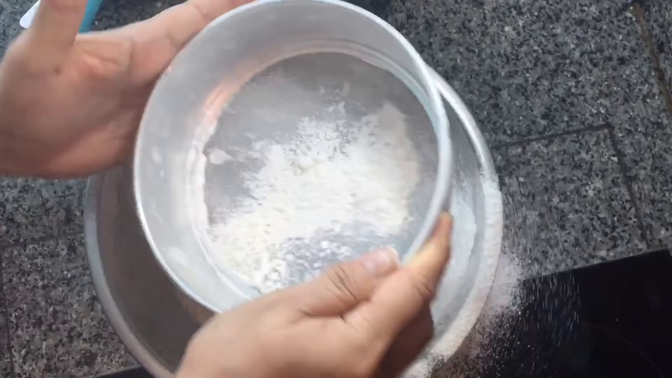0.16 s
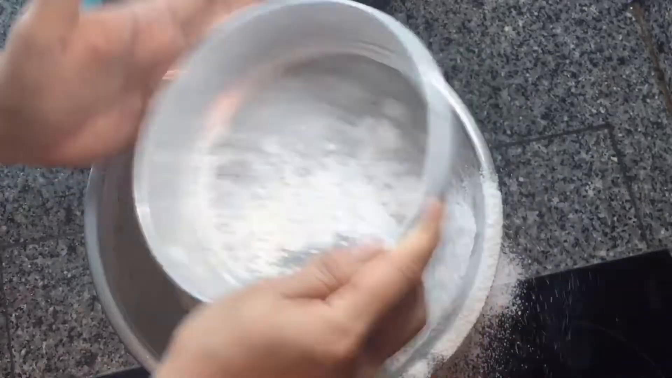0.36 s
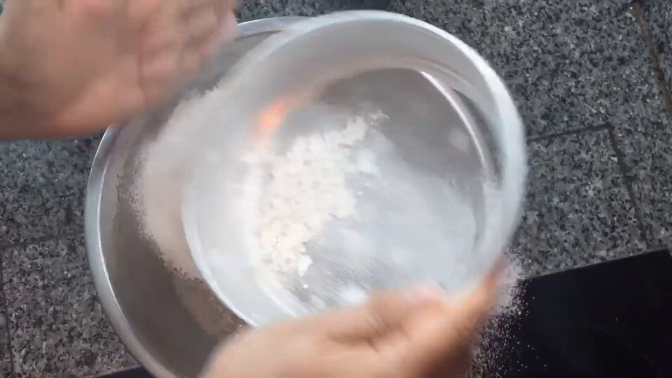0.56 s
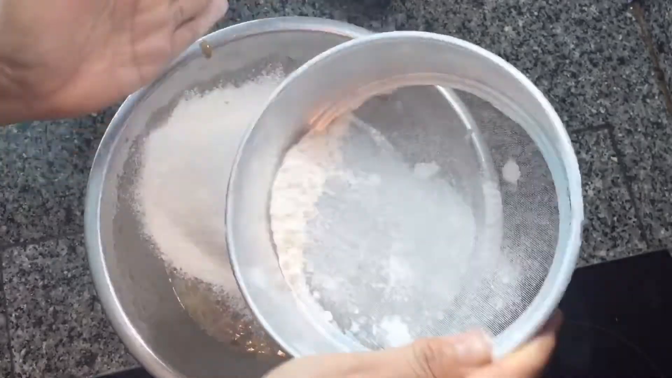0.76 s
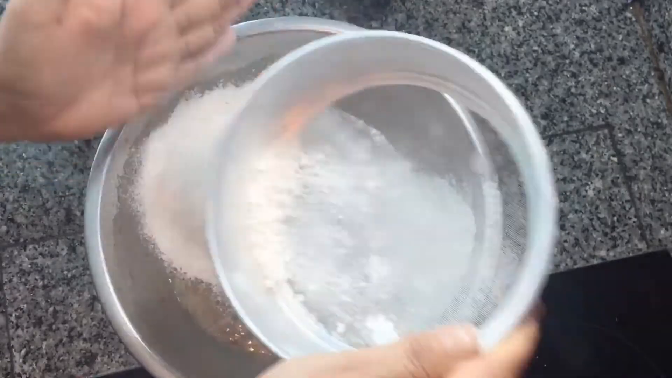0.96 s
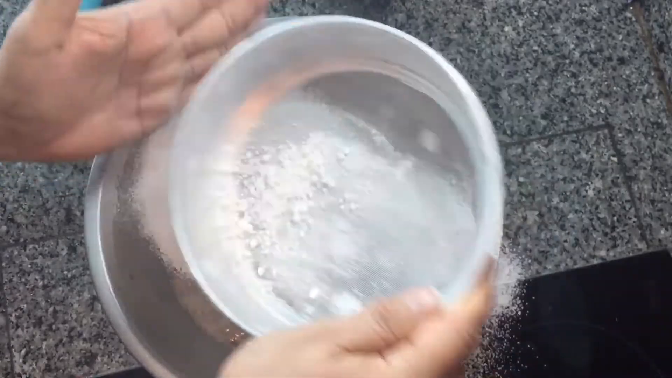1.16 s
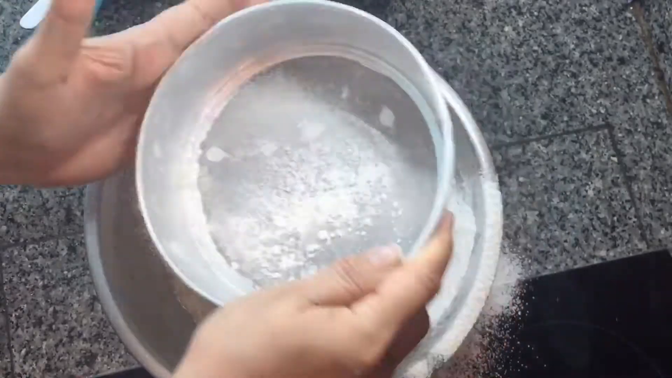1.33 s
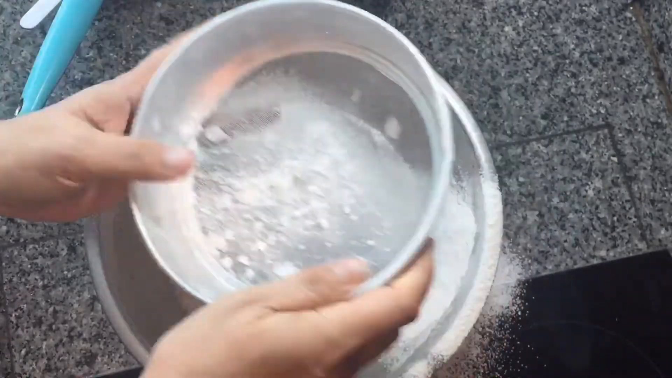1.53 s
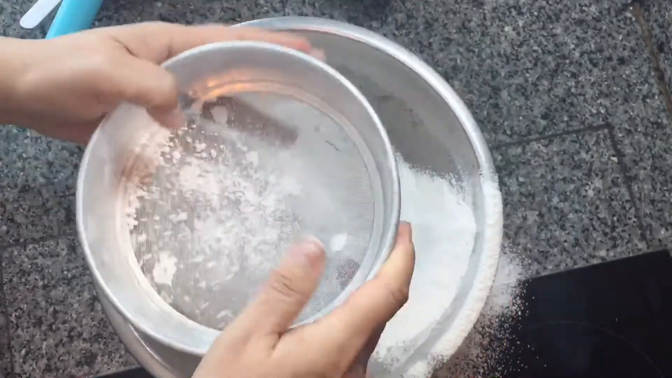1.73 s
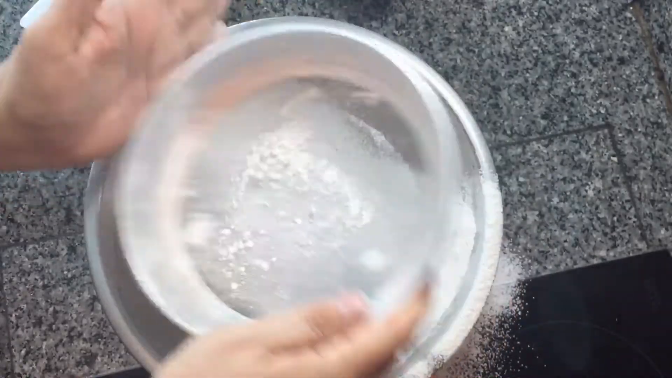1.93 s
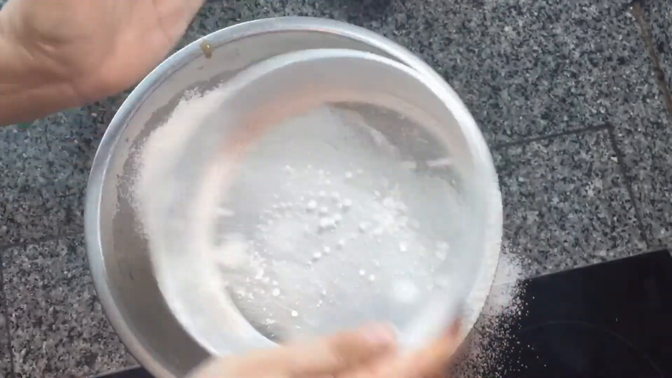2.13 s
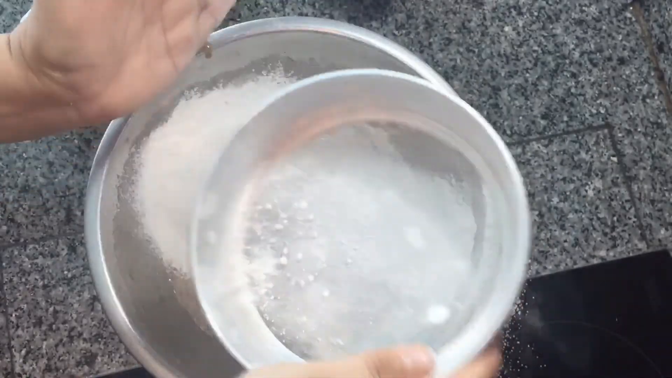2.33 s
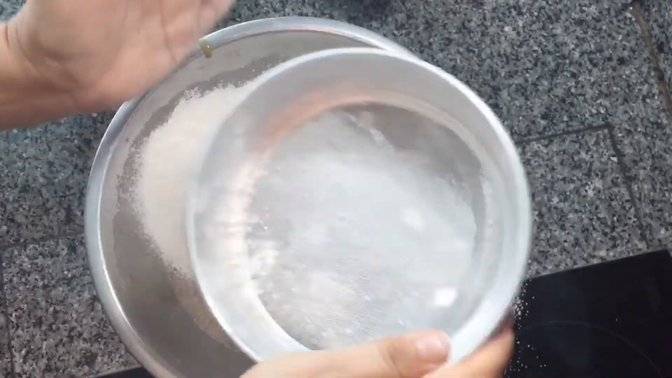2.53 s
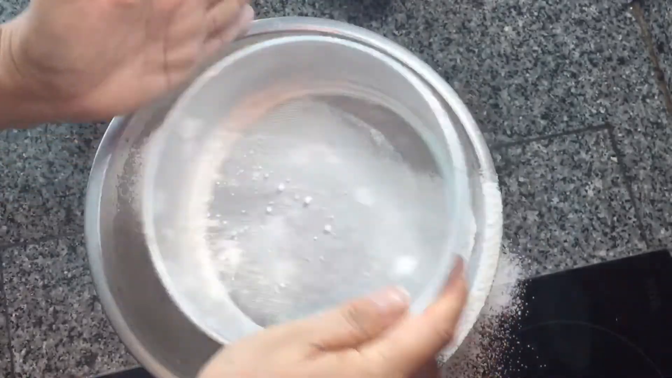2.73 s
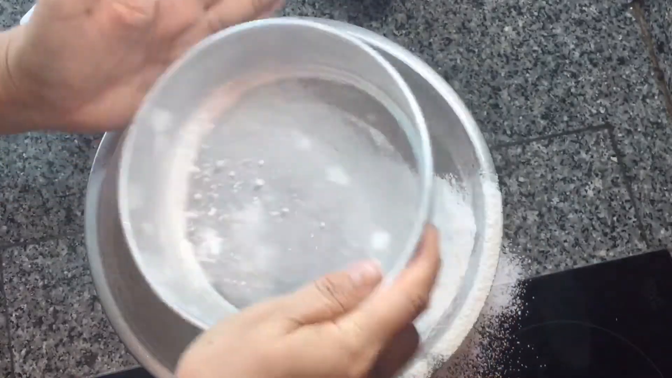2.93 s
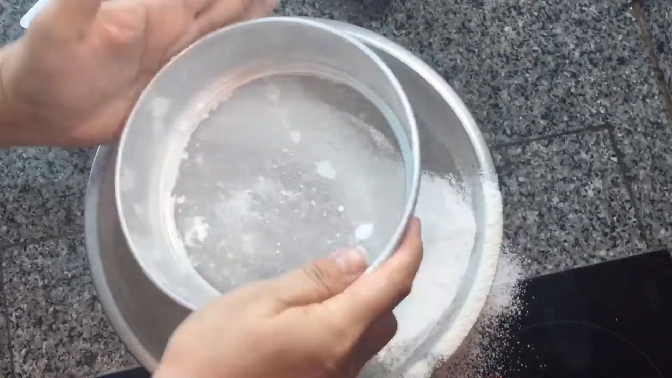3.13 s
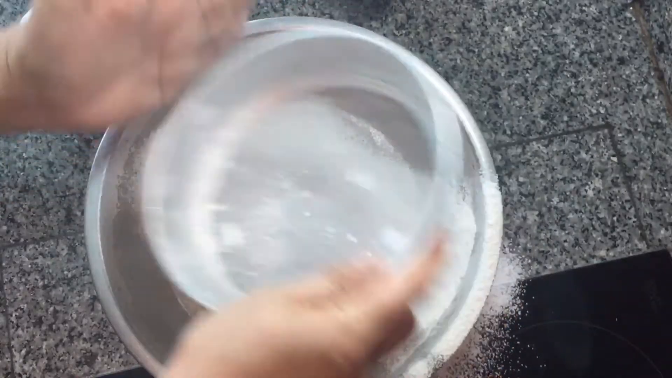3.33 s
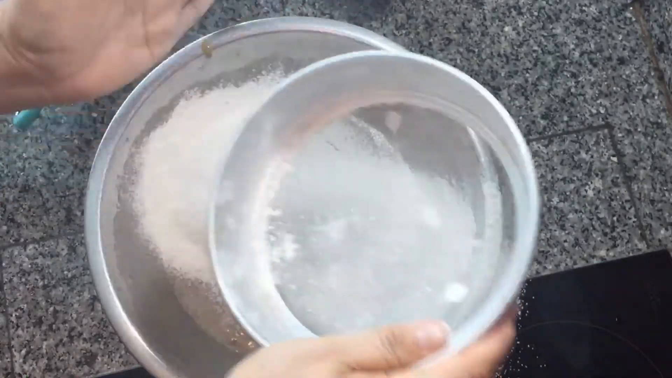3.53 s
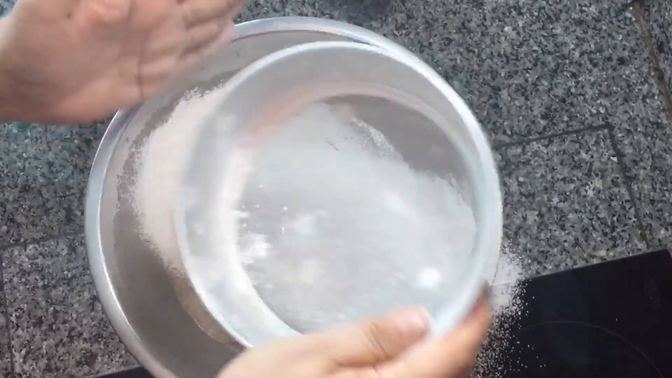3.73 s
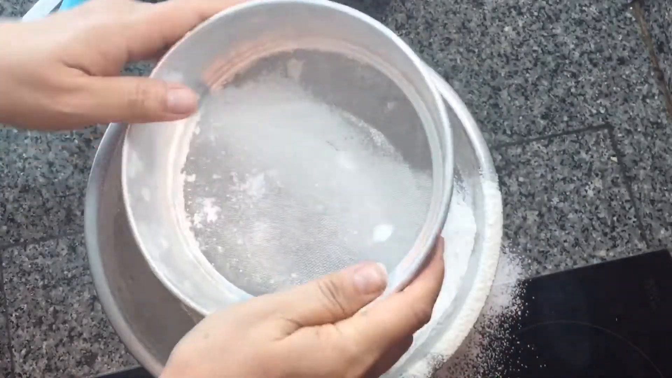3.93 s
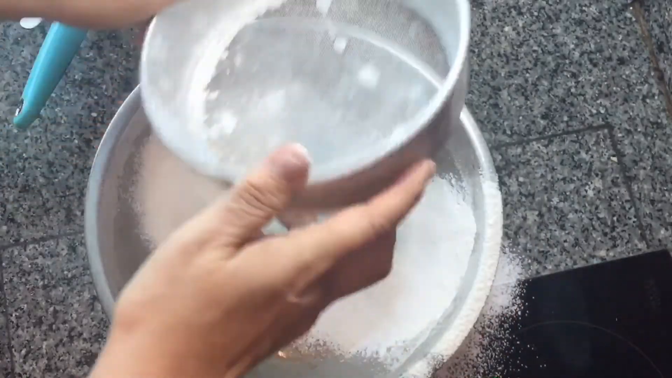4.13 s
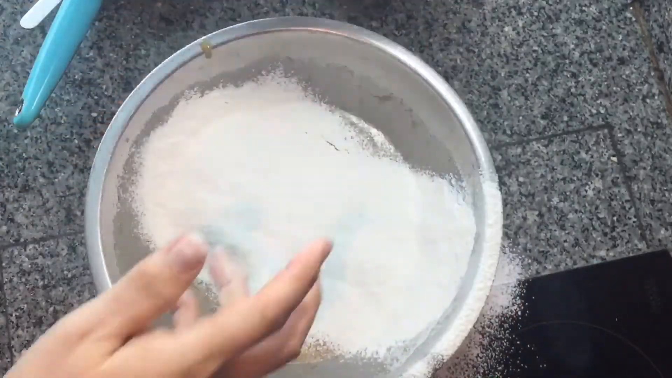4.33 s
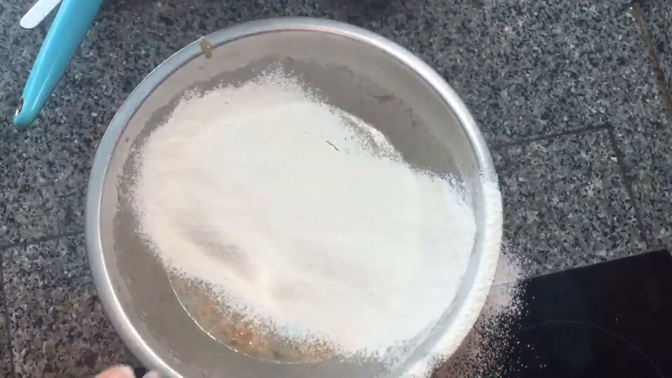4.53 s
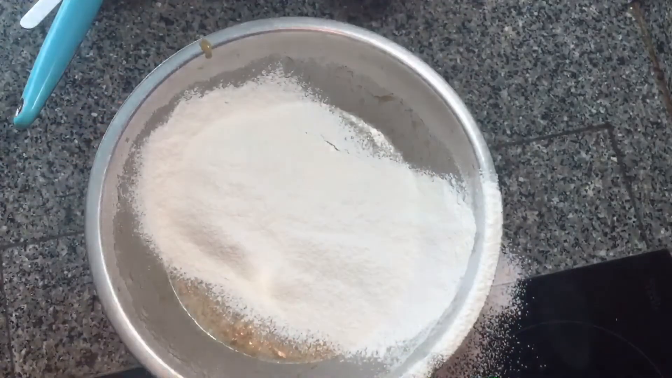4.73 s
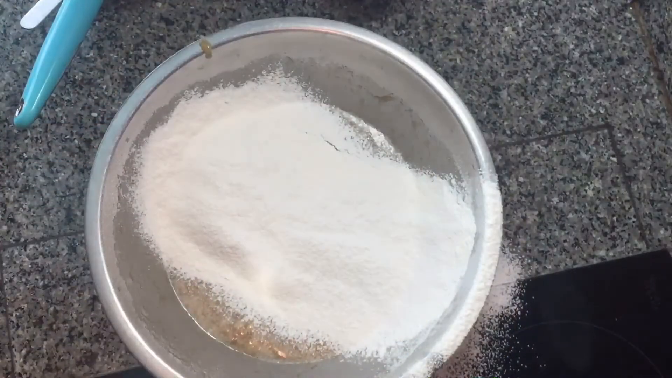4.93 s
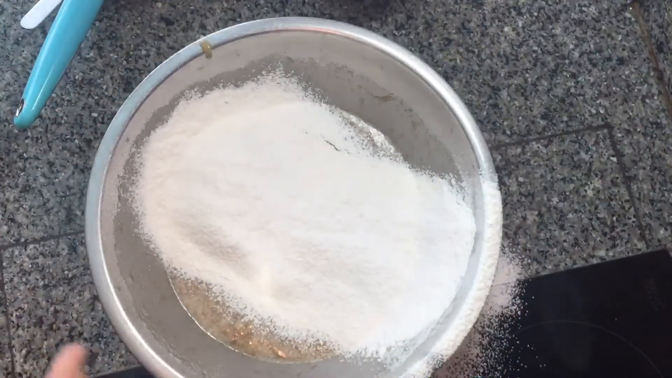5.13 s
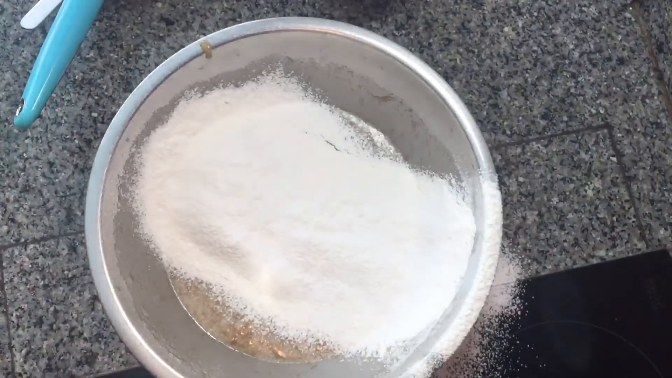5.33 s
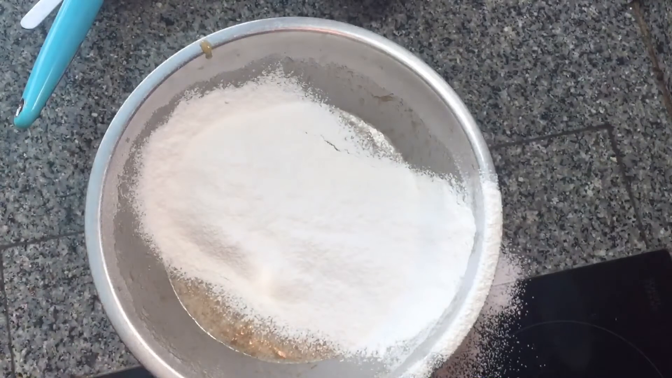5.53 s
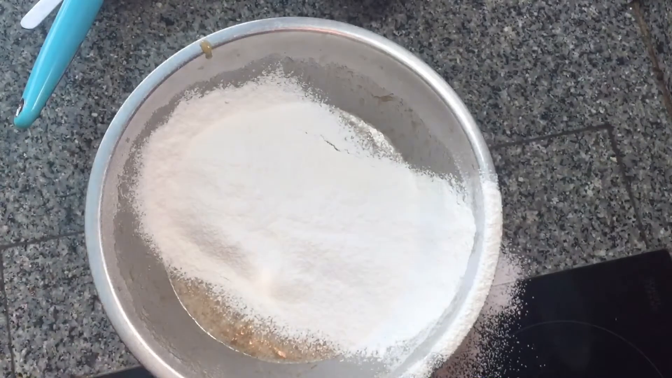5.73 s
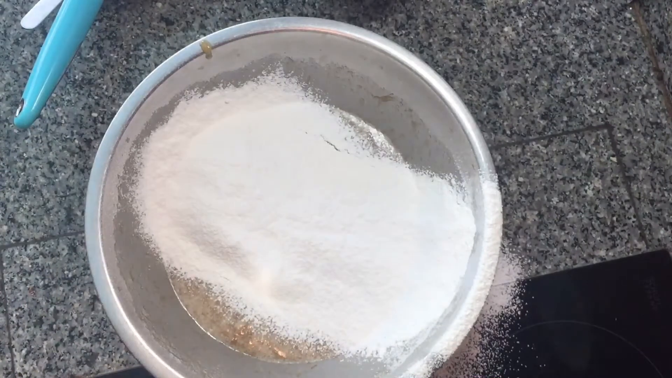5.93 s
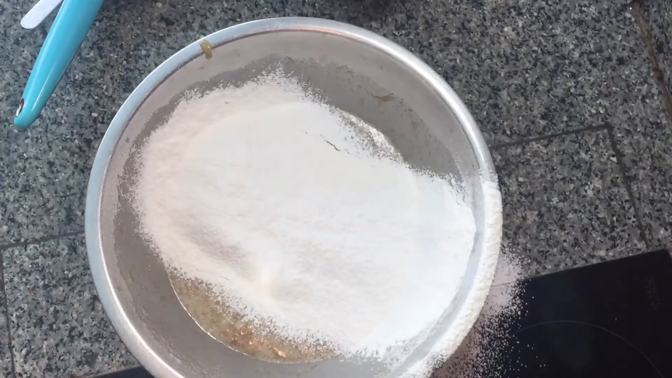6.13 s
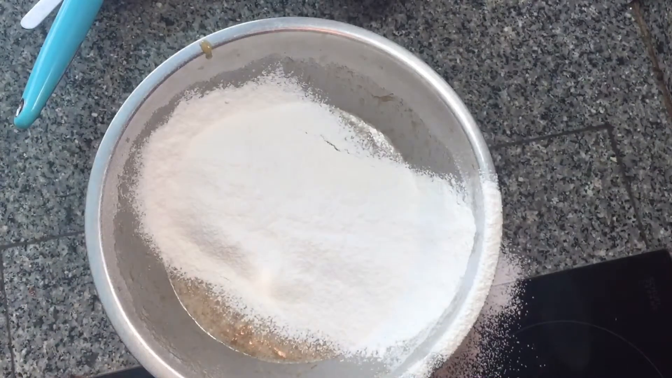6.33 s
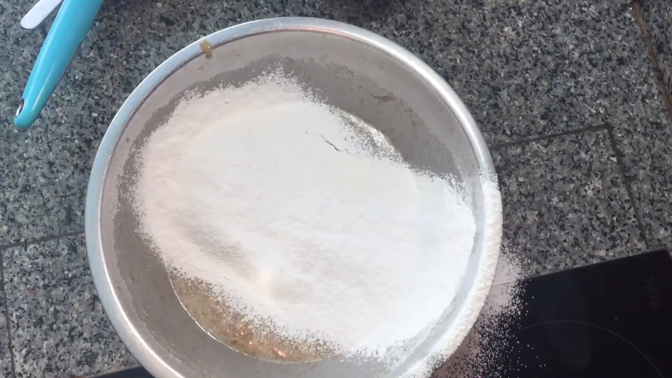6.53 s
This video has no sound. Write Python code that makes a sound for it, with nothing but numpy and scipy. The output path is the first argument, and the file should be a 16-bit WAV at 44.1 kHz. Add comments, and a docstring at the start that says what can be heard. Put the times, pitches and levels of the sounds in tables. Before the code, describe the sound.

A metal sieve is knocked against a palm about four times a second, each blow a sharp, rattling clack with a dull thud and a faint hiss of flour. After about four seconds the knocking stops. The sieve lands on a stone counter with a quick clatter, followed by a soft bump and hands brushing together. A kitchen appliance hums low throughout, with the microphone close above the bowl.

```python
"""Sifting flour over a steel bowl.

A round sieve is knocked against a palm about four times a second: its loose mesh ring clacks in the
frame, the mesh thuds, flour hisses through. Fingers slide on the rim, the sieve lands and rocks on the
stone counter, and floury hands are brushed off. A kitchen appliance hums throughout."""
import sys
import numpy as np
from scipy import signal
from scipy.fft import rfft, irfft, next_fast_len
from scipy.io import wavfile
from scipy.ndimage import uniform_filter1d, map_coordinates

SR = 44100
rng = np.random.default_rng(int(sys.argv[2]) if len(sys.argv) > 2 else 0)


def dump(signal):
    """Clip the signal to [-1, 1] and save it as 16-bit WAV at the path in sys.argv[1]."""
    limited = np.clip(np.atleast_2d(signal).T, -1, 1)
    pcm = np.round(limited * 32767).astype(np.int16)
    wavfile.write(sys.argv[1], SR, pcm)


N = 290178
TIME_S = np.arange(N) / SR
AGE_S = np.arange(SR // 3) / SR  # time since a blow

# Knocks. Each row: start in seconds, clack level in dB, place (0 wall, 1 lip), then mesh thud,
# frame knock and sizzle trims in dB on that level.
KNOCKS = [(0.0211, 2.5, .1, 15.5, -2, -0.5), (0.2395, 5, 0.13, 13.5, 1.5, -3), (0.482, 13, .1, 3, 2, -10),
          (0.708, 6, 0.09, 4, 3.5, -1.5), (0.9469, 8, 0.47, 13, 0.5, -2.5),
          (1.1885, 13, 0.18, 5, -1.5, -14), (1.4147, 5, .2, 7.5, 4.5, -0.5),
          (1.6242, -10, .2, 16.5, 5.5, 1), (2.0631, 2.5, 1, -13, -3, 1), (2.2853, -1, 0.76, -15, -25, -1),
          (2.2911, -9, .7, -9, -3, 12.5), (2.5003, 1.5, 0.98, -4, -3, 1.5),
          (2.7263, 9.5, 0.96, -11.5, -6.5, -3), (2.9579, 14.5, 1, -11.5, -8.5, -2),
          (3.2039, 16, 1, -13, -9, -9), (3.4591, 13, 0.53, -5.5, -15.5, -7.5),
          (3.7049, 11, 0.35, -7.5, 0.5, -9), (3.9424, 3.5, 0.26, 17, 9.5, -0.5)]
# Hand-held frame. Each row: mode in Hz, wall-struck dB, lip-struck dB, base t60 in seconds.
FRAME_MODES = [(930, -3, -8, .04), (1170, -3, -1, .05), (1400, -2, -7, .04), (1620, -3, -6, .04),
               (1850, 1, -5, .045), (2010, 2, 2, .055), (2170, -5, 3, .06), (2670, 1, -5, .05),
               (2830, -4, -2, .055), (3240, -8, -2, .05), (3400, -4, -8, .05), (3650, -8, -2, .04),
               (3915, -2, -1, .05), (4270, -5, -4, .04), (4800, -6, -6, .04), (5600, -7, -5, .035),
               (6530, -2, -1, .045), (6740, -9, -2, .04), (8350, -8, -6, .025), (9700, -9, -7, .02)]
# Taut mesh; frame on the counter. Each row: mode in Hz, level in dB, base t60 in seconds.
MESH_MODES = [(255, -12, 0.094), (481, -9, .03), (566.4, -1.5, 0.092), (617, 2, 0.088), (704, 6, 0.007)]
RESTING_MODES = [(540, -9, .04), (794, -2, .09), (968, 0, .08), (1042, -1, .07), (1100, -4, .06),
                 (1205, -2, .06), (1272, -3, .07), (1341, 0, .08), (1445, -5, .05), (1548, -3, .07),
                 (2261, -18, .08), (2670, -17, .07), (2900, -16, .07), (3320, -13, .11), (3908, -20, .07),
                 (5588, -20, .08)]
# Contacts. Each row: start in seconds, relative level in dB.
LANDING_CONTACTS = [(4.8042, -2), (4.8095, -8), (4.8208, 0), (4.8275, -10), (4.835, -11), (4.8435, -7),
                    (4.8575, -8)]
RING_TICKS = [(1.698, -36), (1.806, -24), (1.906, -32), (4.165, -24.5), (4.888, -10), (4.895, -11.5),
              (4.91, -19), (4.942, -10.5), (4.967, -16)]
COUNTER_BUMPS = [(5.635, -5.5), (6.44, -18)]
# Fingers on the rim. Each row: start in seconds, length in seconds, level in dB.
RIM_SLIDES = [(1.563, 0.073, -60), (1.614, 0.1, -56), (1.787, 0.13, -49), (3.97, 0.11, -54),
              (4.122, 0.065, -48.5), (4.196, 0.032, -53), (4.475, 0.046, -66.5)]
# Hand strokes. Each row: start, rise and length in seconds, hiss in dB, palm in dB re hiss.
HAND_STROKES = [(5.483, 0.054, 0.24, -57, -7), (5.925, 0.056, 0.077, -38, -22),
                (6.157, 0.14, 0.14, -54.5, -20), (6.276, 0.2, 0.21, -44.5, -9)]
# Mains hum. Each row: time in seconds, level in dB.
HUM_LEVELS = [(0, -40.5), (3.5, -43.5), (5.0, -42), (6.58, -37.5)]
# Motor tones and thin whine. Each row: frequency in Hz, level in dB.
MOTOR_TONES = [(53.5, -60), (203.5, -60), (289, -62), (402, -66), (2780, -80), (2840, -82)]
# Spectra. Each row: frequency in Hz, relative level in dB.
PALM_SPECTRUM = [(60, -11.5), (160, 1.5), (260, -2), (400, -5), (700, -17), (2000, -42.5)]  # struck flesh
FLOUR_SPECTRUM = [(500, -34), (1500, -14), (3000, 8.5), (4200, -8), (6500, -9), (10000, -8), (16000, -7.5)]  # powder passing the mesh
STONE_SPECTRUM = [(35, -28.5), (100, -9.5), (350, -4), (600, -7.5), (1100, 4.5), (1600, -4), (2200, -6.5),
                  (3500, -10.5), (4700, -23), (5700, -10.5), (8000, -15.5), (15000, -30.5)]  # contact crack
GRIT_SPECTRUM = [(700, -33), (1500, -31.5), (2800, -25), (4500, -13), (6500, 0.5), (9000, 2), (12000, 3.5),
                 (16000, -7)]  # floury fingers on the rim
SKIN_SPECTRUM = [(800, -33), (1500, -15), (2100, 1.5), (3200, 0.5), (5000, -2.5), (7000, -6.5),
                 (10000, -10.5), (16000, -15)]  # skin on skin
BUMP_SPECTRUM = [(150, -15), (400, -3), (620, -1), (850, -3), (1250, -11.5), (2200, -6), (3500, -27),
                 (9000, -29)]  # soft bumps
AIR_SPECTRUM = [(20, -17), (35, -17.5), (55, -0.5), (80, -3.5), (160, -4.5), (230, -10.5), (400, -13),
                (600, -17), (900, -28), (1500, -33), (2500, -35.5), (2800, -38.5), (3200, -38.5),
                (6000, -39), (9000, -45), (16000, -48)]  # appliance airflow
ROOM_SPECTRUM = [(200, -5.5), (600, -0.5), (1200, -3.5), (2800, -3), (7000, -5), (15000, -1)]  # reverb colour
# Kitchen decay. Each row: frequency in Hz, t60 in seconds.
ROOM_T60 = [(200, 0.23), (1000, 0.67), (3000, 0.69), (7000, 0.51), (15000, 0.15)]

MAINS_HZ, TOP_HZ = 100, 16100
FIRST_HARD_DB, LAST_HARD_DB, SOFTEN_S = 4, -19, 0.013  # landing contacts


def knocks():
    """Each knock clacks the frame and thumps the palm; blows on the wall make the mesh thud most."""
    out = np.zeros(N)
    for start_s, db, lip, thud_db, knock_db, sizzle_db in KNOCKS:
        hit = band(clack(t60_s=0.072, ring_db=-5.5, lip=lip), 1650, 7800)
        hit += amp(knock_db) * band(clack(t60_s=0.08, ring_db=-2.5, lip=lip), 760, 1600)
        hit += amp(sizzle_db) * band(clack(t60_s=0.042, ring_db=2, lip=lip), 7800, 17000)
        mesh = ring(MESH_MODES, damping=1, scatter_db=0.5) * (1 - np.exp(-AGE_S / 0.0011))
        hit += amp(thud_db - 21) * unit_energy(mesh)
        thump = unit_energy(coloured(chatter(t60_s=0.14, spike_db=-0.5), PALM_SPECTRUM))
        add(out, start_s, amp(db + 1) * hit + amp(0.46 * db - 15.5) * thump)
        ring_slip = band(chatter(t60_s=0.0094, spike_db=4), 3300, 16000)
        add(out, start_s - 0.001, amp(db - 13) * ring_slip)
        # modes blur over all directions, so a smooth click is the room's main feed
        outline = [(300, -18.5), (600, thud_db + 5), (900, knock_db - 0.5), (1500, knock_db - 9),
                   (2200, -1), (6500, -2), (10000, sizzle_db)]
        click = coloured(signal.unit_impulse(len(AGE_S)), outline)
        add(out, start_s, amp(db - 17.5) * reverb(click))
        add(out, start_s, amp(db - 24) * reverb(hit))
    return out


def clack(t60_s, ring_db, lip):
    """The loose ring chatters against the frame, whose modes depend on the place struck."""
    modes = [(hz, wall_db + lip * (lip_db - wall_db), decay_s)
             for hz, wall_db, lip_db, decay_s in FRAME_MODES]
    burst = chatter(t60_s, spike_db=2.5) + amp(0.5) * chatter(t60_s=0.01, spike_db=2.5)
    return unit_energy(burst) + amp(ring_db) * ring(modes, damping=1.36, scatter_db=5.5)


def chatter(t60_s, spike_db):
    """A dying burst of tiny hard contacts of uneven size."""
    sizes, grains = rng.standard_normal((2, len(AGE_S)))
    size_db = spike_db * unit_rms(uniform_filter1d(sizes, size=12))
    return unit_energy(grains * amp(size_db - 60 * AGE_S / t60_s))


def ring(modes, damping, scatter_db):
    """Decaying modes, at new strengths for each blow; damping divides the base t60."""
    hz, db, t60_s = np.transpose(modes)[:, :, None]
    size, detune, phase = rng.standard_normal((3, len(modes), 1))
    swing = np.sin(2 * np.pi * hz * (1 + 0.0045 * detune) * AGE_S + np.pi * phase)
    envelope = amp(db + scatter_db * size - 60 * AGE_S * damping / t60_s)
    return unit_energy(np.sum(envelope * swing, axis=0))


def sifting():
    """Every knock throws the flour, which falls back and hisses through the mesh."""
    flow = np.zeros(N)
    fall = (1 - np.exp(-AGE_S / 0.0083)) * amp(-60 * AGE_S / 0.43)
    for start_s, db, *_ in KNOCKS:
        add(flow, start_s, amp(0.48 * db - 54.5) * fall)
    return flow * noise(FLOUR_SPECTRUM) * amp(1.5 * wobble(800) + 4.5 * wobble(30))


def landing():
    """The sieve strikes the counter and rocks on its rim, each contact softer than the last."""
    out = np.zeros(N)
    first_s = LANDING_CONTACTS[0][0]
    for start_s, db in LANDING_CONTACTS:
        hard_db = LAST_HARD_DB + (FIRST_HARD_DB - LAST_HARD_DB) * np.exp((first_s - start_s) / SOFTEN_S)
        body = amp(8.5) * ring(RESTING_MODES, damping=1.1, scatter_db=1)
        crack = amp(hard_db + 17.5) * coloured(chatter(t60_s=0.032, spike_db=1.5), STONE_SPECTRUM)
        add(out, start_s, amp(db) * (body + crack))
    return in_room(out, wet_db=-12.5)


def small_contacts():
    """The loose ring ticks as the sieve turns and settles; soft bumps at the counter follow."""
    out = np.zeros(N)
    for start_s, db in RING_TICKS:
        tick = clack(t60_s=0.06, ring_db=-7, lip=0.4)
        add(out, start_s, amp(db) * band(tick, 2000, 15500))
    for start_s, db in COUNTER_BUMPS:
        add(out, start_s, amp(db) * coloured(chatter(t60_s=0.058, spike_db=6), BUMP_SPECTRUM))
    return in_room(out, wet_db=-2.5)


def finger_slides():
    """Floury fingers rub the rim with uneven pressure: gritty hiss and some scraping."""
    grit = patchy(noise(GRIT_SPECTRUM) * amp(1.3 * wobble(670) + 1.4 * wobble(70)), depth_db=2.5)
    rubbing = sum(amp(db) * stroke(start_s, length_s, rise_s=0.031, release_s=0.11)
                  for start_s, length_s, db in RIM_SLIDES)
    pressure = amp(2.2 * wobble(40))
    return in_room((grit + amp(-7.5) * scrape()) * rubbing * pressure, wet_db=-14.5)


def scrape():
    """Skin sticks and slips on the rim; the frame rings differently as the grip moves."""
    slip_hz = 170 * amp(3.3 * wobble(40))
    cycles = np.floor(np.cumsum(slip_hz) / SR)
    slips = np.diff(cycles, prepend=0) * amp(3 * rng.standard_normal(N))
    modes = [(hz, wall_db, t60_s) for hz, wall_db, _, t60_s in FRAME_MODES]
    out = np.zeros(N)
    for _ in range(3):
        grip = amp(8 * wobble(35))
        out += signal.fftconvolve(slips * grip, ring(modes, damping=0.6, scatter_db=3.5))[:N]
    return unit_rms(out)


def hand_brushing():
    """Skin brushes skin: the fingers hiss, the changing hollow of the palm adds body."""
    hiss = patchy(noise(SKIN_SPECTRUM), depth_db=3.5)
    palm = patchy(noise([(200, -15.5), (600, -16), (1300, 3), (2500, -7), (6000, -49.5)]), depth_db=4)
    out = np.zeros(N)
    for start_s, rise_s, length_s, db, palm_db in HAND_STROKES:
        out += amp(db) * stroke(start_s, length_s, rise_s, release_s=0.1) * (hiss + amp(palm_db) * palm)
    return in_room(out * amp(1.2 * wobble(160) - 1.5), wet_db=-6)


def appliance():
    """Mains hum and unsteady motor tones over the rush of moving air."""
    hum_db = np.interp(TIME_S, *np.transpose(HUM_LEVELS)) + 0.76 * wobble(9)
    tones = amp(hum_db) * np.sin(2 * np.pi * MAINS_HZ * TIME_S + 0.06 * wobble(3.2))
    for hz, db in MOTOR_TONES:
        drift_rad = 1.7 * wobble(0.65 * np.sqrt(hz))
        flutter_db = 2.5 * wobble(9)
        tones += amp(db + flutter_db) * np.sin(2 * np.pi * hz * TIME_S + drift_rad)
    return np.sqrt(2) * tones + amp(-50) * noise(AIR_SPECTRUM)


def reverb(x):
    """The kitchen's diffuse reflections, uneven from band to band."""
    hz, time_s, bins = signal.stft(rng.standard_normal(SR * 2 // 3), SR, nperseg=256)
    colour_db = along(ROOM_SPECTRUM, hz) + 3 * rng.standard_normal(len(hz))
    decay_db = 60 * time_s / along(ROOM_T60, hz)[:, None]
    tail = signal.istft(bins * amp(colour_db[:, None] - decay_db), SR, nperseg=256)[1]
    tail *= 1 - np.exp(-np.arange(len(tail)) / SR / 0.0028)  # reflections build up
    return signal.fftconvolve(x, unit_energy(tail))


def in_room(x, wet_db):
    """A track plus its reverb."""
    return x + amp(wet_db) * reverb(x)[:N]


def stroke(start_s, length_s, rise_s, release_s):
    """Rubbing envelope: smooth rise, hold, then a fade of 60 dB per release_s."""
    onset = np.sin(np.pi / 2 * np.clip((TIME_S - start_s) / rise_s, 0, 1)) ** 2
    return onset * amp(-60 * np.maximum(TIME_S - start_s - length_s, 0) / release_s)


def patchy(x, depth_db):
    """Short-lived resonances: random gain in patches of frequency and time."""
    bins = signal.stft(x, nperseg=512)[2]
    patches = uniform_filter1d(rng.standard_normal(bins.shape), size=3, axis=0)
    patches = unit_rms(uniform_filter1d(patches, size=10, axis=1))
    return unit_rms(signal.istft(bins * amp(depth_db * patches), nperseg=512)[1][:N])


def wobble(knots_per_s):
    """Smooth random curve."""
    return map_coordinates(rng.standard_normal(int(N * knots_per_s / SR) + 4), [TIME_S * knots_per_s])


def noise(spectrum):
    """Coloured noise of rms 1."""
    return unit_rms(coloured(rng.standard_normal(N), spectrum))


def coloured(x, spectrum):
    """Minimum-phase filter with the given (Hz, dB) shape."""
    size = 2 * next_fast_len(len(x) // 2 + 4096)
    gain = amp(along(spectrum, np.fft.rfftfreq(size, 1 / SR)))
    cepstrum = irfft(np.log(gain + 1e-6), size)
    cepstrum[1:size // 2] *= 2
    cepstrum[size // 2 + 1:] = 0
    return irfft(rfft(x, size) * np.exp(rfft(cepstrum)), size)[:len(x)]


def band(x, lo_hz, hi_hz):
    """One band of a blow, as strong as that band of a unit impulse."""
    sos = signal.butter(3, [lo_hz, hi_hz], 'band', fs=SR, output='sos')
    return unit_energy(signal.sosfilt(sos, x)) * np.sqrt(2 * (hi_hz - lo_hz) / SR)


def along(points, hz):
    """Read (Hz, value) points on a log axis."""
    points_hz, values = np.transpose(points)
    return np.interp(np.log(hz + 1), np.log(points_hz + 1), values)


def add(track, start_s, x):
    """Mix x into the track."""
    part = track[round(start_s * SR):][:len(x)]
    part += x[:len(part)]


def amp(db):
    """Decibels to gain."""
    return 10 ** (np.asarray(db) / 20)


def unit_rms(x):
    """Scale to rms 1."""
    return x / np.sqrt(np.mean(x ** 2) + 1e-20)


def unit_energy(x):
    """Scale to energy 1."""
    return x / (np.linalg.norm(x) + 1e-12)


def scene():
    """Mono mix, heard from just above the bowl."""
    sieve = knocks() + sifting() + finger_slides() + landing() + small_contacts()
    return (sieve + hand_brushing() + appliance())[None]


def record(dry):
    """Round off the sharpest peaks, then low-pass at TOP_HZ."""
    rounded = dry / (1 + np.abs(dry / 0.75) ** 4) ** (1 / 4)
    size = next_fast_len(N + 8192)
    lowpass = np.clip((TOP_HZ - np.fft.rfftfreq(size, 1 / SR)) / 400 + 0.5, 0, 1)
    return irfft(rfft(rounded, size) * lowpass, size)[..., :N]


dry = scene()
out = record(dry)
dump(out)
```